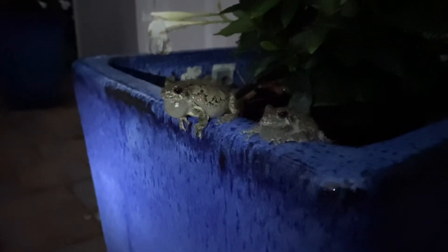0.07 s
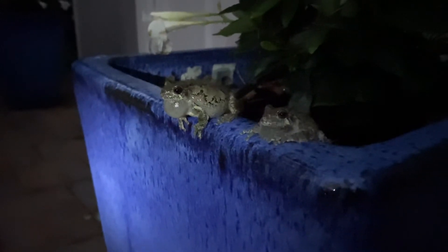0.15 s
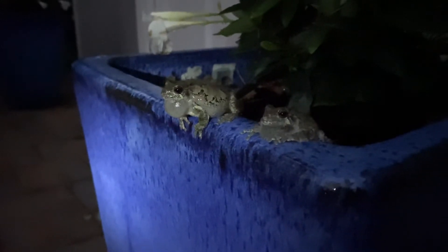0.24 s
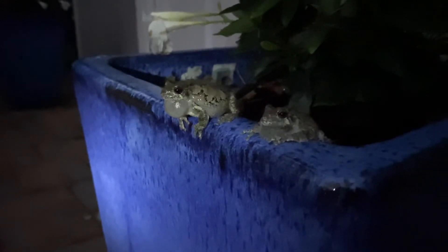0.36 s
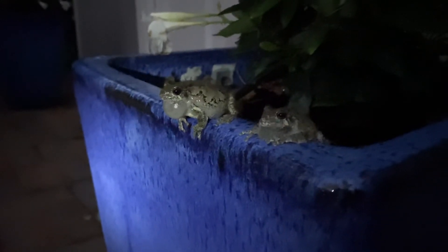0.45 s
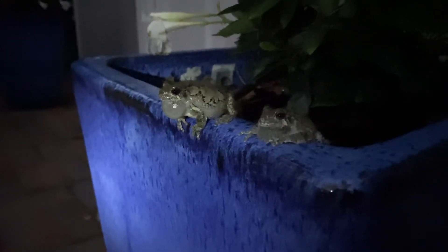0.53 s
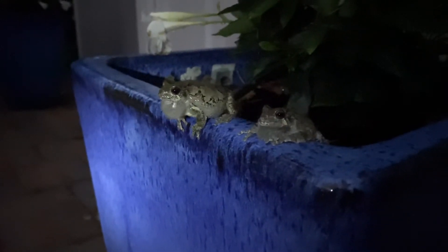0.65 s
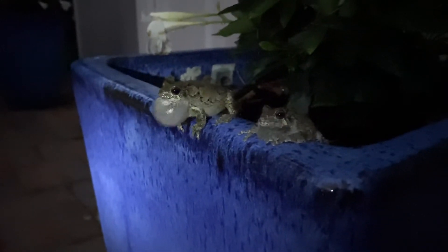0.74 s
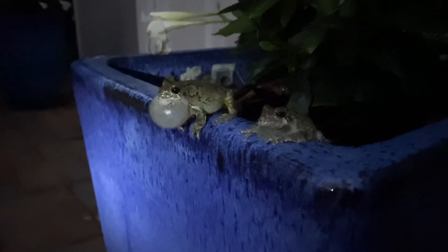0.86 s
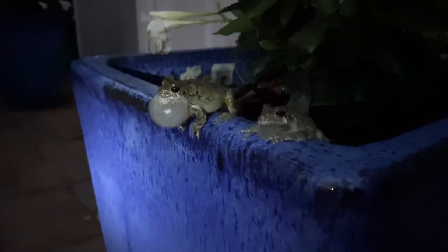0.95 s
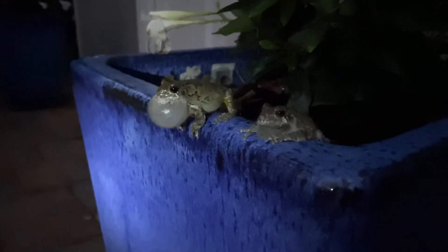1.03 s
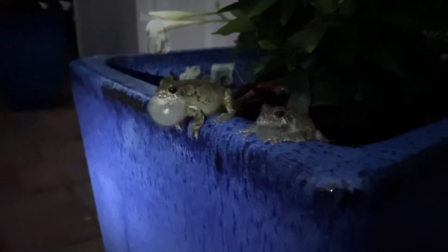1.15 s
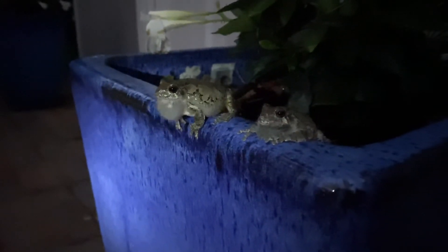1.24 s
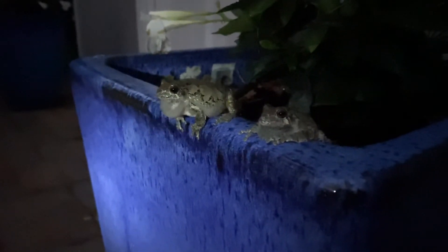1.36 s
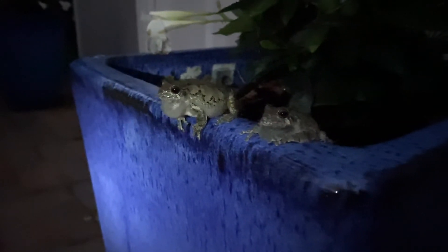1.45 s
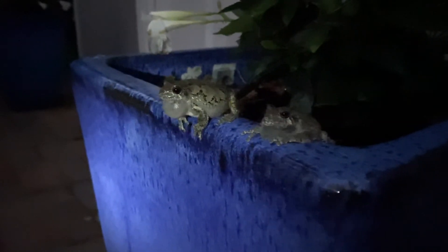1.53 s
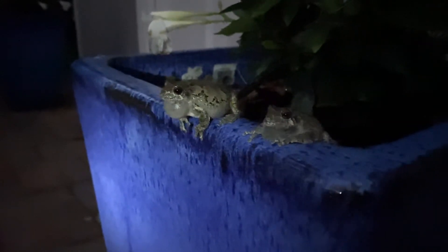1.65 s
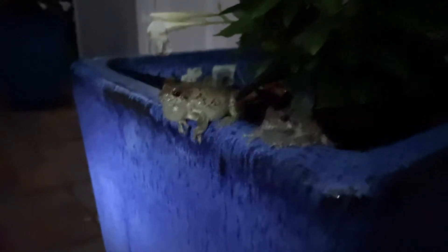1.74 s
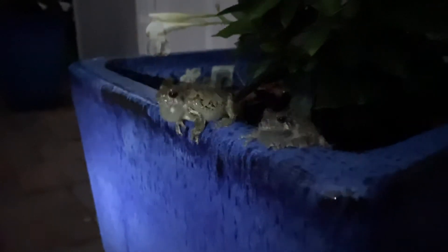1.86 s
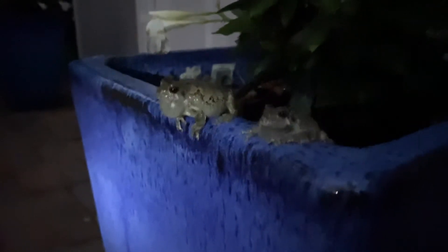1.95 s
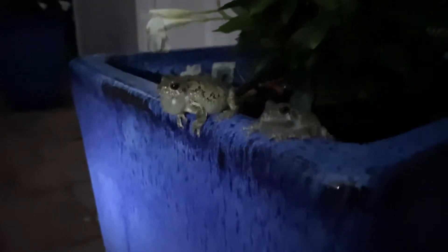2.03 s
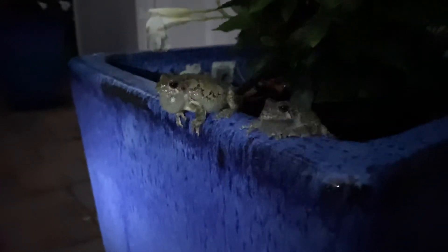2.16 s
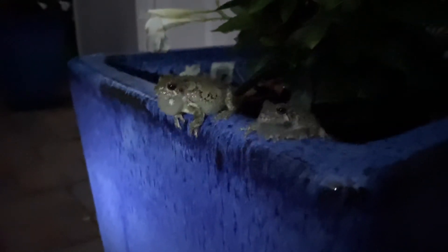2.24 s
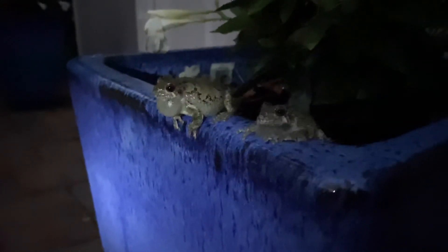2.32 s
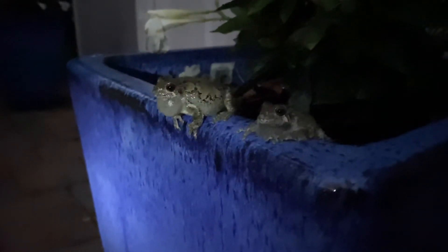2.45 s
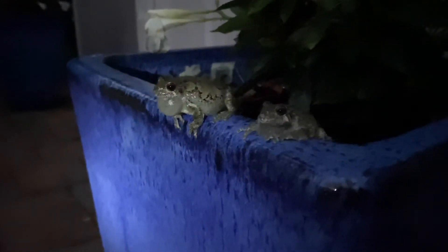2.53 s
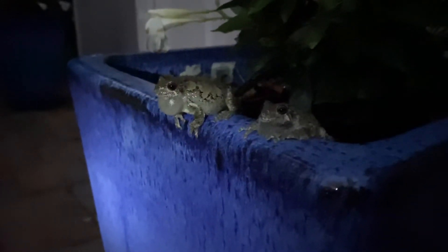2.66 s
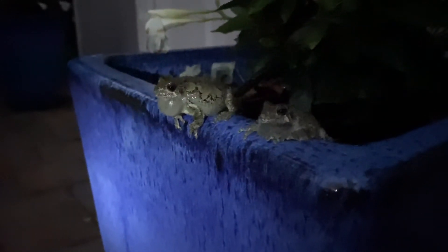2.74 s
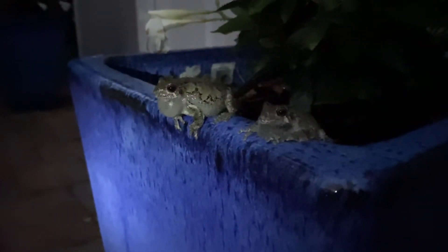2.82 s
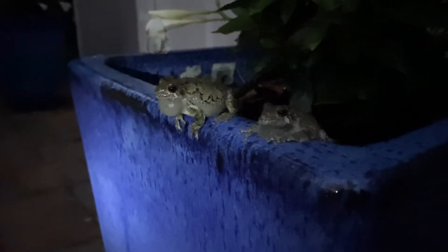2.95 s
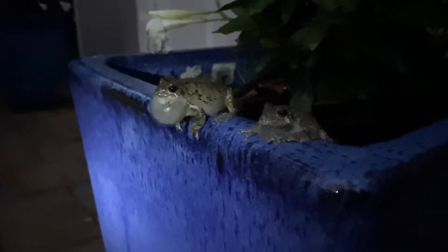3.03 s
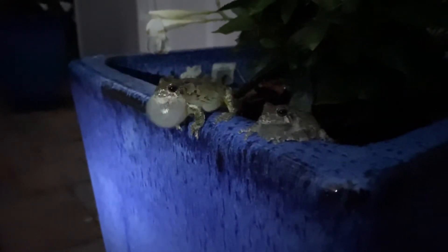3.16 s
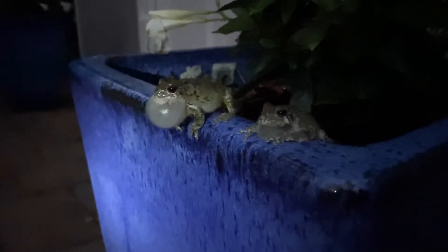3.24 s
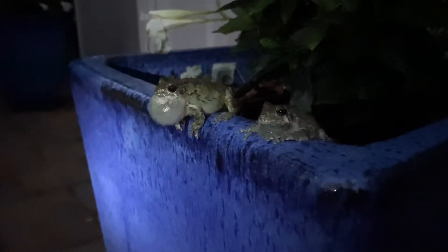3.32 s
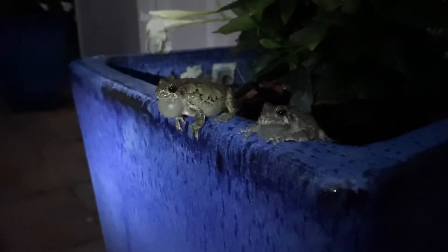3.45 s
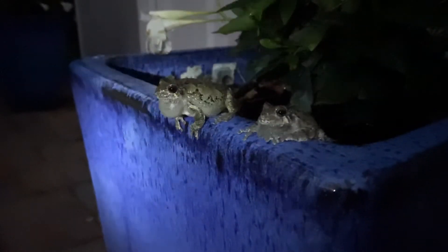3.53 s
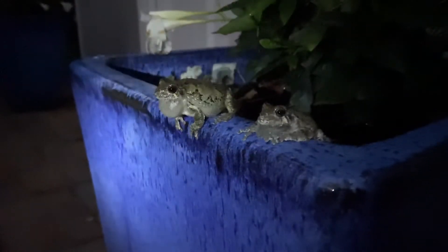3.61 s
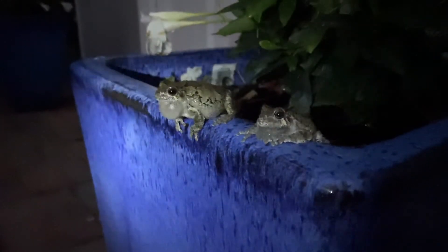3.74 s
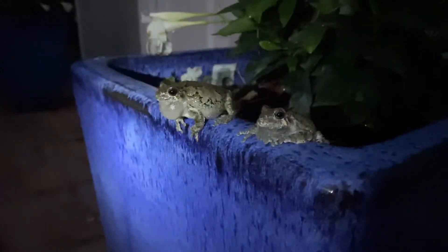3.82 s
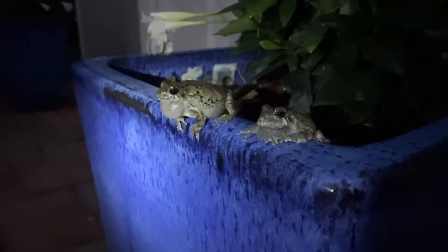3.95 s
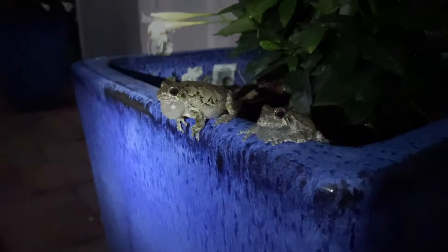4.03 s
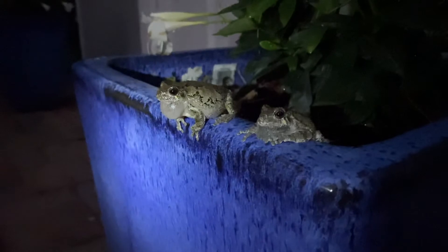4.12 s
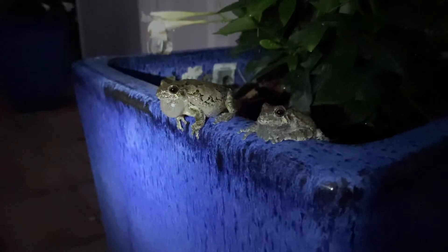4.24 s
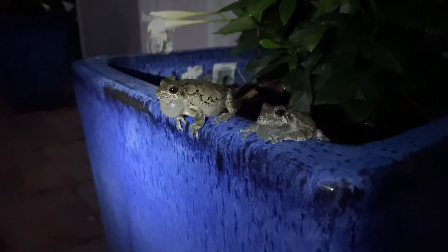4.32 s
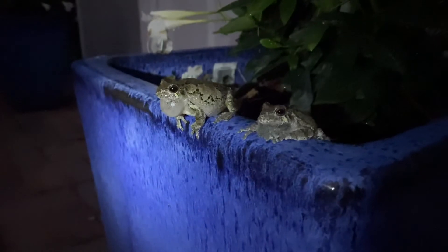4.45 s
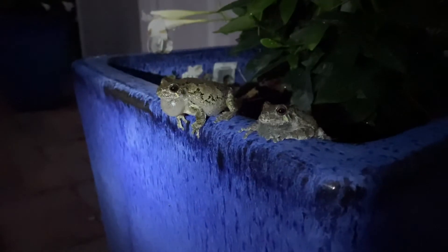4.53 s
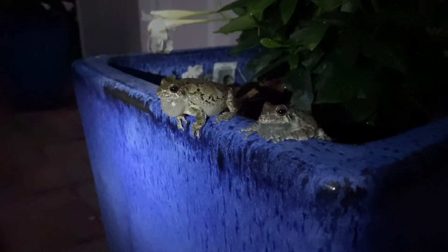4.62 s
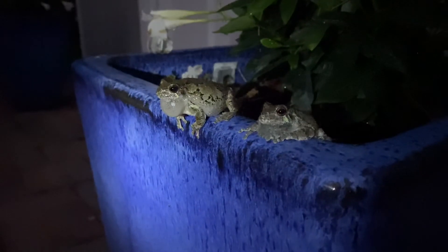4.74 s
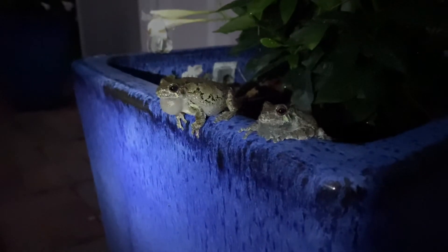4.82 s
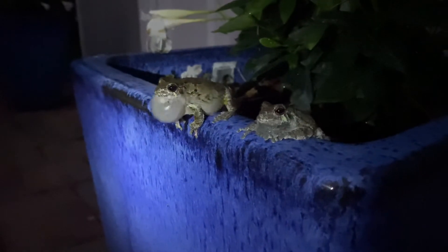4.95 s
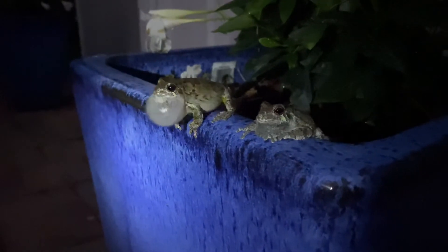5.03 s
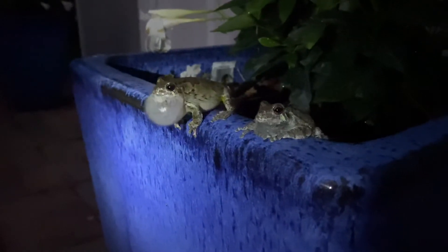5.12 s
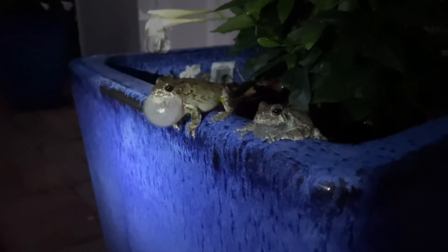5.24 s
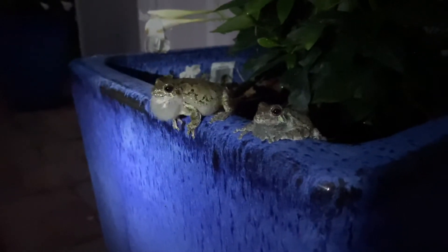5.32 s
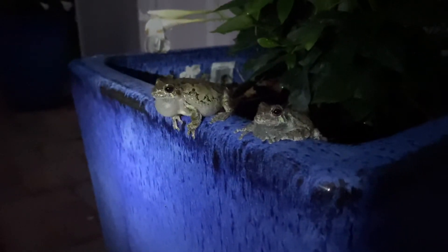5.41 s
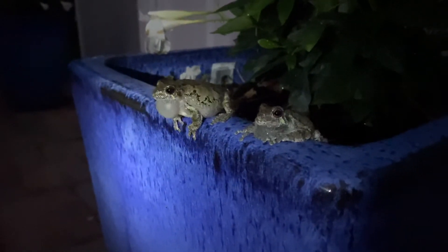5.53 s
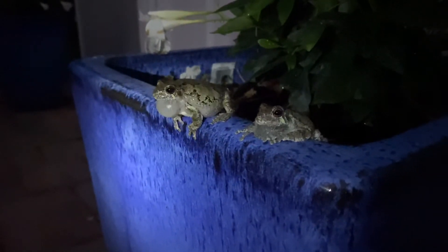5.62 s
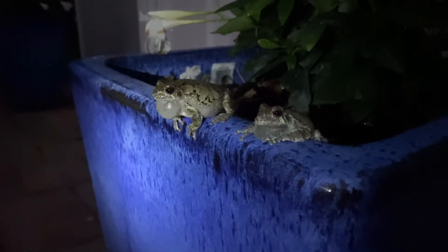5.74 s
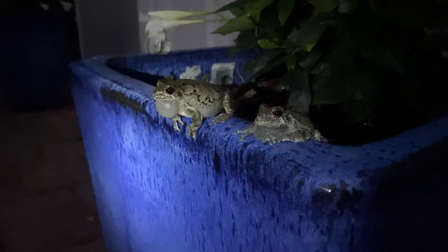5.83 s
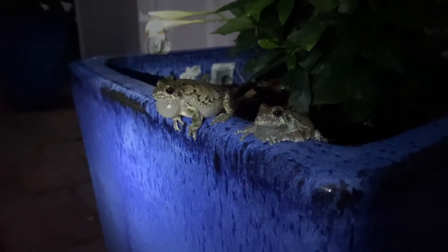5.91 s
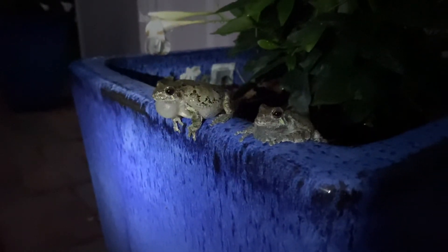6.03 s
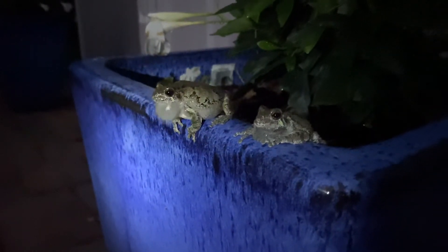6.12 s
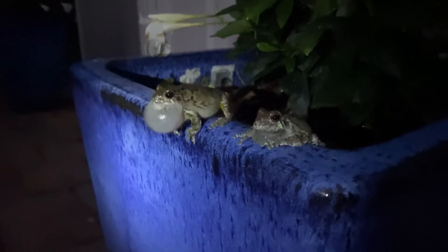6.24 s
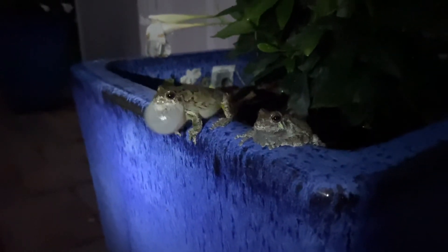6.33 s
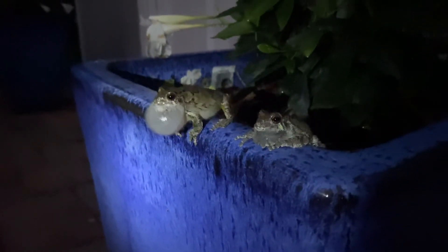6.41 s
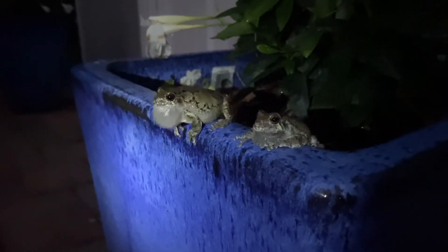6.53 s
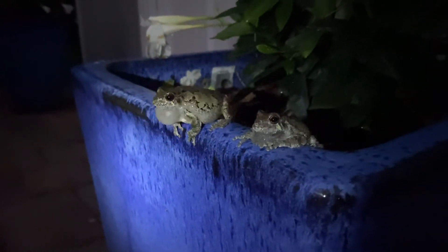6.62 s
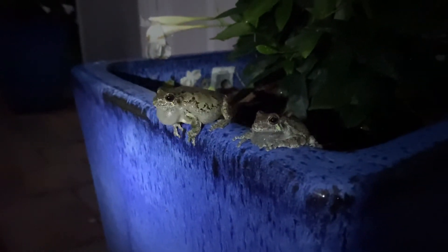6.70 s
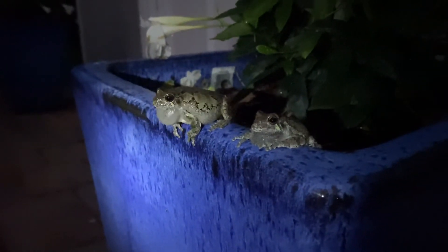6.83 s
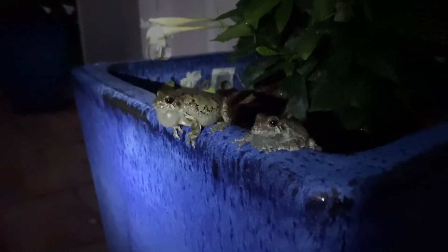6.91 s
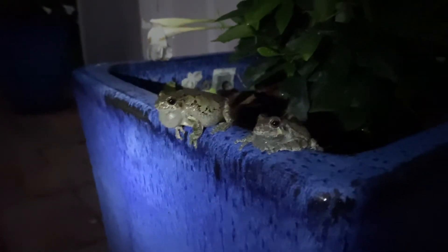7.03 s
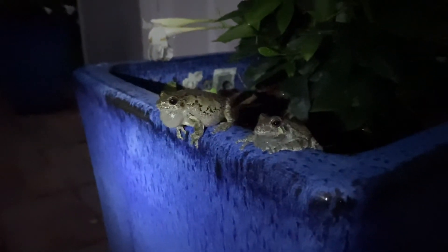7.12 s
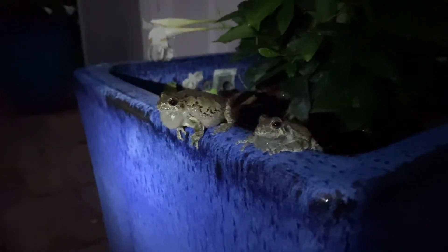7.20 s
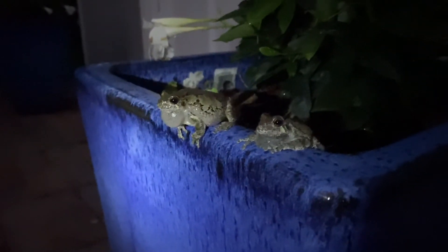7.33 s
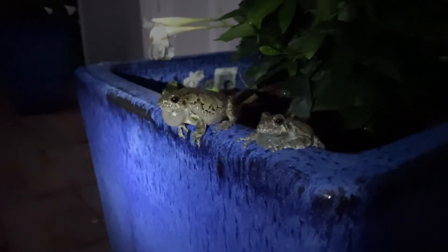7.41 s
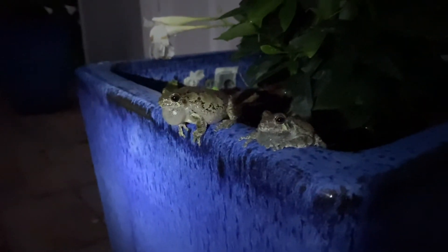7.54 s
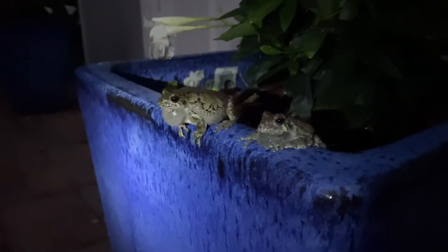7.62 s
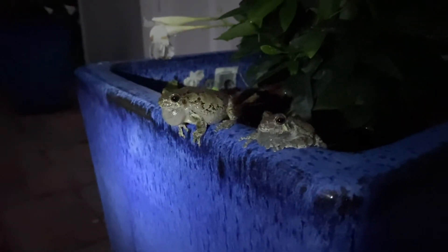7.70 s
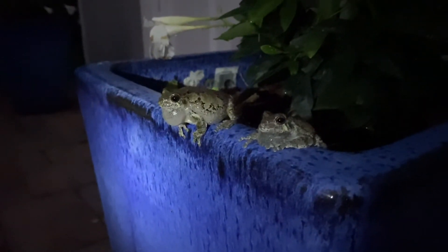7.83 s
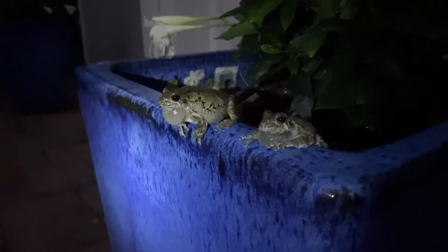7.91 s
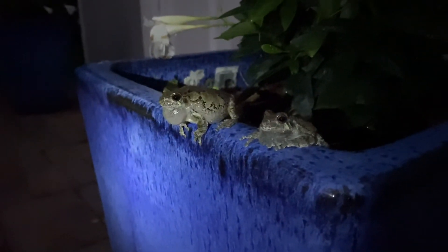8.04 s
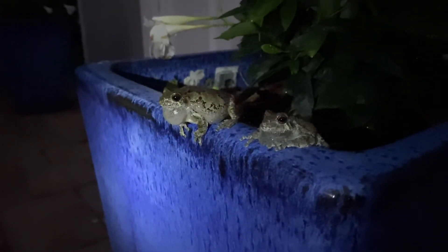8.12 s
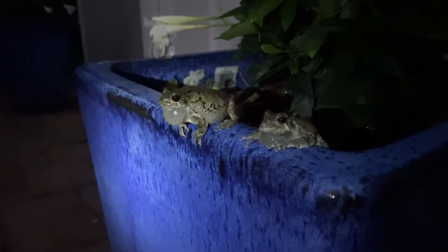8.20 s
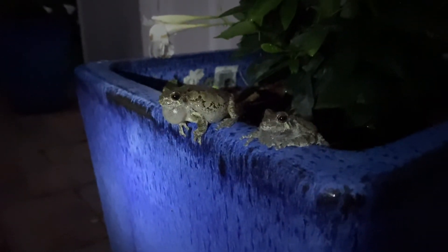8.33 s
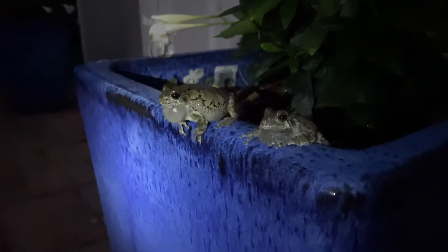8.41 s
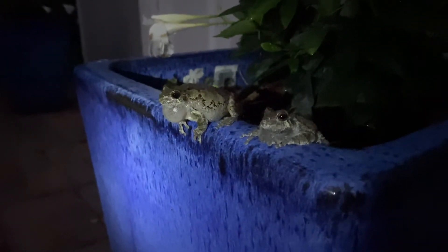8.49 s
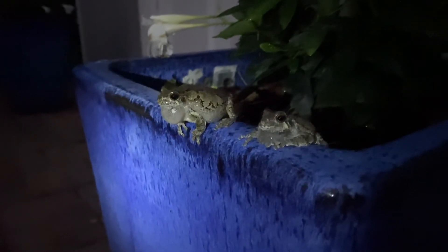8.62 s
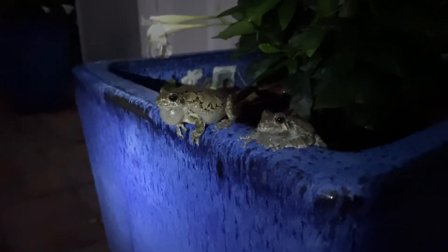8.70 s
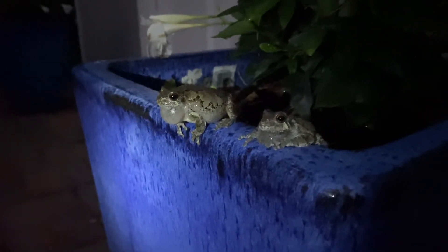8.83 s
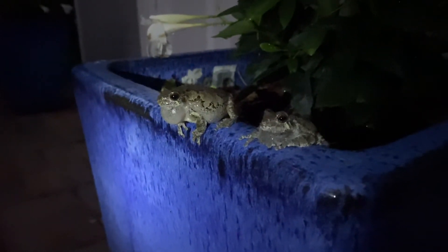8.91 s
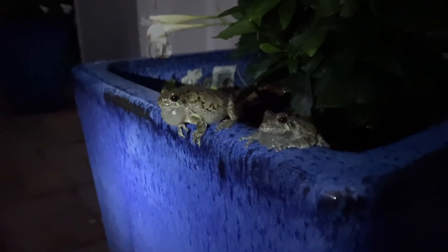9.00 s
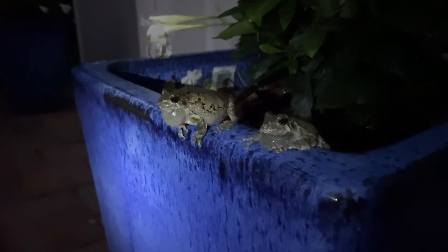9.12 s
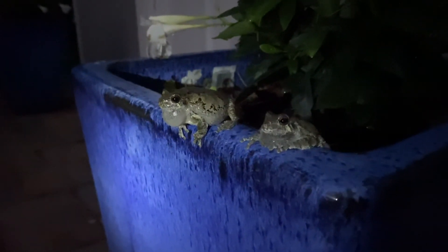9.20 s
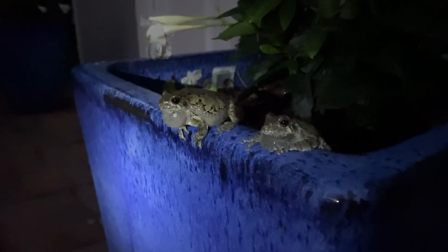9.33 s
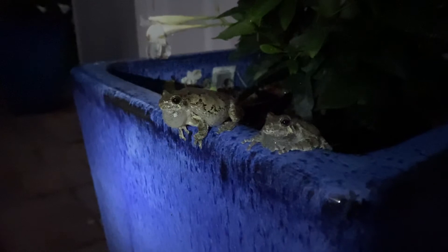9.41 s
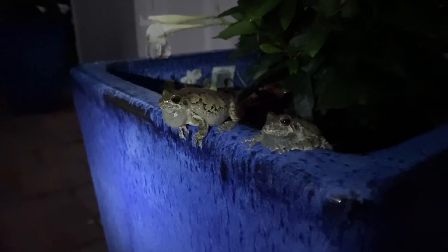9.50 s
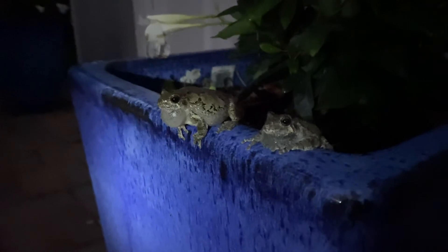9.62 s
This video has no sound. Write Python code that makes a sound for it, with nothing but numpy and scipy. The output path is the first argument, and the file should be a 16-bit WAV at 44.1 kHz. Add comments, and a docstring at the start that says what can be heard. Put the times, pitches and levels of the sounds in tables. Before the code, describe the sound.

On a quiet night outdoors, a tree frog on the rim of a glazed planter gives four loud trills, close to the microphone and slightly left. Each is a fast row of short rising chirps, starting weak and swelling at once, with a brief echo from walls and yard. A far frog trills very faintly three times. Beneath lie soft insects, low machine hum and distant traffic rumble.

```python
"""A gray tree frog trills four times at night on the rim of a glazed planter, close and a little to the left.
Each trill is a row of short upward chirps: harmonic partials plus noise, swept through vocal sac resonances.
House walls, porch and yard answer with reflections and diffuse noise tails.
A second frog trills far away, over faint noise-band insects, a low hum of machines and distant traffic."""
import sys
import numpy as np
from scipy import signal
from scipy.fft import rfft, irfft, next_fast_len
from scipy.io import wavfile
from scipy.ndimage import map_coordinates

SR = 44100
rng = np.random.default_rng(int(sys.argv[2]) if len(sys.argv) > 2 else 0)


def wav_out(sig):
    """Save sig, one row per channel (or a flat mono array), as 16-bit PCM at SR to the path in sys.argv[1]."""
    wavfile.write(sys.argv[1], SR, np.round(np.clip(np.atleast_2d(sig).T, -1, 1) * 32767).astype(np.int16))


N = 426006


def amp(db):
    """Decibels to amplitude ratio."""
    return 10 ** (np.asarray(db) / 20)


def unit(x):
    """x at rms 1."""
    return x / np.sqrt(np.mean(x ** 2) + 1e-20)


def along(points, hz):
    """Interpolate (Hz, value) points on a log frequency axis."""
    f, v = np.transpose(points)
    return np.interp(np.log(hz + 1), np.log(f + 1), v)


def wobble(rate_hz, size=N):
    """Smooth random curve, rate_hz knots a second."""
    knots = np.arange(size) * rate_hz / SR
    coarse = np.arange(0, knots[-1] + 1, 1 / 8)
    values = rng.standard_normal(int(knots[-1]) + 4)
    return np.interp(knots, coarse, map_coordinates(values, [coarse]))


def filtered(x, response):
    """x times a complex response of frequency."""
    n = x.shape[-1]
    m = next_fast_len(n + 2048, real=True)
    hz = np.fft.rfftfreq(m, 1 / SR)
    return irfft(rfft(x, m) * response(hz), m)[..., :n]


def coloured(x, spectrum):
    """x through a (Hz, dB) response of zero phase."""
    return filtered(x, lambda hz: amp(along(spectrum, hz)))


def ringing(points, size=4096):
    """Causal, minimum-phase impulse response of a (Hz, dB) colour, by folding its cepstrum."""
    hz = np.fft.rfftfreq(size, 1 / SR)
    cepstrum = irfft(np.log(amp(along(points, hz))))
    cepstrum[1:size // 2] *= 2
    cepstrum[size // 2 + 1:] = 0
    return irfft(np.exp(rfft(cepstrum)))[:size // 2]


def add(track, start_s, sound):
    """Mix a sound into a track from start_s on."""
    part = track[..., max(round(start_s * SR), 0):][..., :sound.shape[-1]]
    part += sound[..., :part.shape[-1]]


JITTER = .009  # pitch flutter, share of pitch, scaled by (2 - drive)
RASP_FOLLOW = .7  # rasp and high partials grow with this power of the drive
CATCH_S, CATCH_WIDTH_S, CATCH_DB = -.0108, .0028, -33  # rough catch as the folds part; s from the crest
# Course of one chirp. Each row: time from the crest in seconds, drive in dB, pitch ratio.
CHIRP_COURSE = [(-.017, -42, .82), (-.0135, -16, .855), (-.010, -14.3, .92), (-.005, -5.3, .985),
                (0, -3.1, 1.033), (.0025, -2.2, 1.083), (.0045, -5.8, 1.14), (.007, -24, 1.14),
                (0.012, -35, 1.177), (.016, -60, 1.197)]
# Partials of the vocal folds. Each row: multiple of the fundamental, level in dB.
FOLD_PARTIALS = [(1, -4.9), (2, -.2), (3, -27), (4, -40), (5, -43), (6, -49), (7, -46), (8, -47)]
# Rasp of the air between the folds. Each row: frequency in Hz, relative density in dB per Hz.
RASP_SPECTRUM = [(350, -4), (600, 5), (900, 4), (2500, 4), (3500, -1), (4500, -4), (6200, -8), (7500, -2),
                 (8300, -5), (9100, -18), (10000, -19), (11600, 3), (12800, -9), (13700, 3.5), (15000, -6)]
# Colour of the catch. Each row: frequency in Hz, relative density in dB per Hz.
CATCH_SPECTRUM = [(300, -2), (620, 6), (1000, -1), (1600, 0), (2700, -5), (4200, -10), (8000, -16),
                  (9200, -29), (12000, -18), (15000, -26)]


def chirp(pitch_hz, soft_db=0, rasp_db=-33.3, vary_db=.4, shorten_per_db=.022):
    """One push of air: folds swell, glide up as they tighten, and shut; soft is brief, mostly fundamental."""
    s, drive_db, ratio = np.transpose(CHIRP_COURSE)
    t = s[0] + np.arange(SR // 25) / SR
    s = s * np.exp(-shorten_per_db * soft_db)
    drive = amp(np.interp(t, s, drive_db, left=-120, right=-120))
    # the folds flutter most while the push is weak
    flutter = 1 + JITTER * (2 - drive) * wobble(900, size=len(t))
    pitch = pitch_hz * np.interp(t, s, ratio) * flutter
    phase = 2 * np.pi * np.cumsum(pitch) / SR

    k, partial_db = np.transpose(FOLD_PARTIALS)
    softness_db = np.where(k == 1, soft_db, -soft_db) / 2
    # partials above the second vary from push to push
    variation_db = vary_db * k * (k > 2) * rng.standard_normal(len(k))
    swell = drive ** np.where(k > 2, RASP_FOLLOW, 1)[:, None]
    partials = swell * np.sin(np.outer(k, phase))
    tone = amp(partial_db + softness_db + variation_db) @ partials

    # air hisses through the gap once in each cycle
    puffs = rng.standard_normal(len(t)) * (1 + np.cos(phase))
    rasp = amp(rasp_db) * drive ** RASP_FOLLOW * unit(coloured(puffs, RASP_SPECTRUM))

    grit = unit(coloured(rng.standard_normal(len(t)), CATCH_SPECTRUM))
    catch = amp(CATCH_DB) * np.exp(-((t - CATCH_S) / CATCH_WIDTH_S) ** 2) * grit
    return tone + catch + rasp


SLOWING_S = .00048  # each period is this much longer than the one before
LEAD_S = .005  # extra pause after the faint opening puff
BUILD = 4.2  # the level shortfall in dB shrinks by this factor with every chirp
EASE_DB, EASE_S = 2.3, .012  # late easing: depth, tanh time scale
FLAT, TIGHTEN_S = .035, .1  # slack folds at the start: share of pitch, time constant
SAG_PER_DB, SAG_MOST = .0028, .1  # weak push is lower: share of pitch per dB of shortfall, limit


def trill(count, period_s, level_db, puff_db, shortfall_db, ease_s, pitch_hz):
    """Rows (s, dB, Hz): a faint puff, a quick build-up, then chirps that slow, rise in pitch and ease off."""
    k = np.arange(-1, round(count))
    s = k * period_s + SLOWING_S * k * (k - 1) / 2 - LEAD_S * (k < 0)
    weak_db = np.where(k < 0, puff_db, shortfall_db / BUILD ** k)
    eased = (1 + np.tanh((s - ease_s) / EASE_S)) / 2
    sag = np.minimum(SAG_PER_DB * weak_db, SAG_MOST)
    slack = FLAT * np.exp(-s / TIGHTEN_S) + sag
    return np.transpose([s, level_db - weak_db - EASE_DB * eased, pitch_hz * (1 - slack)])


# Trills of the near frog. Each row: crest of the first full chirp in seconds, number of full chirps,
# first period in seconds, level in dB, shortfall of the opening puff in dB, shortfall of the first chirp
# in dB, time into the trill when the push eases in seconds, pitch in Hz before slack and glide.
NEAR_TRILLS = [(.6886, 11, .0373, -4.2, 31, 5, .25, 1022), (2.9592, 8, .03755, -3.5, 52, 13, .21, 1016),
               (4.8817, 9, .03735, -4.1, 52, 11, .21, 1014), (6.1178, 8, .0378, -3.6, 40, 8, .135, 1020)]


def near_frog(full_db=-6, softest_db=11, scatter_db=.5):
    """Push-by-push trills of the frog on the rim; the opening chirps are weak, low and dull."""
    voice = np.zeros(N)
    for start_s, *shape in NEAR_TRILLS:
        for s, db, pitch_hz in trill(*shape):
            push = chirp(pitch_hz, soft_db=np.clip(full_db - db, 0, softest_db))
            level = amp(db + scatter_db * rng.standard_normal())
            add(voice, start_s + s + CHIRP_COURSE[0][0], level * push)
    return voice


# Sac and planter rim as heard at each microphone. Each row: frequency in Hz, level in dB.
SAC_RIM_LEFT = [(300, -40), (500, -24.5), (750, -12.5), (880, -0.5), (980, -5), (1070, -8.5), (1220, 6.5),
                (1500, -10.5), (1850, -5), (2020, 4.5), (2170, -2.5), (2310, 0.24), (2750, -4),
                (3700, -5.5), (9000, -8)]
SAC_RIM_RIGHT = [(300, -43.5), (500, -32.5), (750, -24), (880, -14), (980, -23), (1070, -36), (1220, 2),
                 (1500, -6.5), (1850, -21), (2020, -5), (2170, -22), (2310, -1.5), (2750, -9.5),
                 (3700, -18.5), (6000, -7.5), (9000, -7.5)]
# Narrow mouth and sac resonances. Each row: frequency in Hz, width in Hz, dB over the smooth response.
MOUTH_RESONANCES = [(2740, 120, -5), (3135, 130, -1), (3930, 110, 2), (4310, 110, 2), (5120, 120, 2),
                    (6030, 70, 0), (6830, 150, -2), (7190, 110, 1), (7560, 150, 0), (7900, 150, -2),
                    (11250, 150, 0)]
# Phase between the microphones. Each row: frequency in Hz, lead of the left in radians.
LEFT_LEAD = [(600, .1), (1000, 0.28), (1250, 1.1), (2000, .3), (2300, 0.61), (3200, .4), (5000, .4),
             (8000, 1.6), (11500, 2.4), (13500, 2.8)]


def at_microphones(voice):
    """Every chirp sweeps through the resonances of the sac and reaches the left microphone first."""
    def mouth(hz):
        response = 1
        for centre, width, db in MOUTH_RESONANCES:
            damping = 1j * hz * width
            response = response + amp(db) * damping / (centre ** 2 - hz ** 2 + damping)
        return response

    sac = np.array([ringing(SAC_RIM_LEFT), ringing(SAC_RIM_RIGHT)])
    pair = signal.fftconvolve(voice[None], filtered(sac, mouth), axes=1)[:, :N]
    return filtered(pair, lambda hz: np.exp(.5j * along(LEFT_LEAD, hz) * [[1], [-1]]))


# Nearby walls. Each row: delay in seconds, left level in dB, right level in dB.
WALL_ECHOES = [(.0035, -29.5, -13), (0.0126, -40.5, -30)]


def walls(x):
    """Single reflections from the house: delayed, panned copies."""
    echo = np.zeros((2, N))
    for delay_s, left_db, right_db in WALL_ECHOES:
        add(echo, delay_s, amp([[left_db], [right_db]]) * x)
    return echo


def reverb(x, decay, onset_s=.008):
    """Diffuse stereo noise tail; each frequency dies at its own speed."""
    hz, t, z = signal.stft(rng.standard_normal((2, SR)), SR, nperseg=256)
    decayed = z * amp(-60 * t / along(decay, hz)[:, None])
    tail = signal.istft(decayed, SR, nperseg=256)[1]
    tail *= 1 - np.exp(-np.arange(tail.shape[1]) / SR / onset_s)
    return signal.fftconvolve(x[None], tail / np.linalg.norm(tail[0]), axes=1)[:, :N]


# What the porch throws back. Each row: frequency in Hz, level in dB.
PORCH_COLOUR = [(500, -31), (900, -34), (1250, -27), (2050, -32), (3000, -24), (4500, -28), (12000, -29)]
# Decay of the porch. Each row: frequency in Hz, t60 in seconds.
PORCH_T60 = [(1000, .11), (2200, .11), (8000, .12)]


def porch(voice):
    """Coloured voice scattered into a short diffuse tail."""
    return reverb(coloured(voice, PORCH_COLOUR), PORCH_T60)


# Trills of the far frog. Each row: start in seconds, end in seconds, level in dB before the yard's
# gains and colour, pitch in Hz before slack and glide.
FAR_TRILLS = [(1.12, 1.43, -60.5, 1000), (6.55, 6.82, -57.2, 980), (8.362, 8.70, -57.2, 988)]


def far_frog(period_s=.0355, swell_s=.04, flat=.06, tighten_s=.13):
    """Trills that start soft and low, swell quickly and rise slowly in pitch."""
    voice = np.zeros(N)
    for start_s, end_s, db, pitch_hz in FAR_TRILLS:
        for s in np.arange(0, end_s - start_s, period_s):
            effort = 1 - np.exp(-(s + period_s / 2) / swell_s)
            push = chirp(pitch_hz * (1 - flat * np.exp(-s / tighten_s)))
            add(voice, start_s + s + CHIRP_COURSE[0][0], amp(db) * effort * push)
    return voice


# What the sac sends out across the yard. Each row: frequency in Hz, level in dB.
SAC_CARRY = [(500, -30.5), (1100, -13), (1500, -16), (1850, -2.5), (2050, 0), (2300, -6), (2600, -13),
             (3200, -1), (6000, -13)]


def carried(voice):
    """Mostly the strong second partial carries into the distance."""
    return coloured(voice, SAC_CARRY)


# Decay of the yard. Each row: frequency in Hz, t60 in seconds.
YARD_T60 = [(300, .5), (1100, .7), (2050, 1.05), (3200, 0.57), (10000, .25)]


def yard(voice, far):
    """Both frogs echo in the yard; the far one is heard as much through the echoes as directly."""
    echoes = reverb(amp(-39.5) * voice + amp(1.2) * far, YARD_T60)
    return carried(amp(1.5) * far + echoes)


# Stereo likeness of the background. Each row: frequency in Hz, left-right correlation.
LEFT_RIGHT_LIKENESS = [(60, 0.99), (130, 0.87), (290, 0.45), (640, -0.06), (1410, -0.33), (3100, 0.094),
                       (6820, 0.0053), (15000, 0.1)]


def rush(spectrum):
    """Stereo noise of rms 1, nearly mono in the bass: the mid/side balance sets the correlation."""
    def mid_side(hz):
        turn = np.arccos(np.clip(along(LEFT_RIGHT_LIKENESS, hz), -1, 1)) / 2
        return amp(along(spectrum, hz)) * [np.cos(turn), np.sin(turn)]

    mid, side = filtered(rng.standard_normal((2, N)), mid_side)
    return unit(np.array([mid + side, mid - side]))


# Distant insects. Each row: frequency in Hz, relative density in dB per Hz.
INSECT_SPECTRUM = [(1700, -30), (2300, 0), (3300, -12), (4500, -1), (5600, -25), (6500, -14), (6780, -2),
                   (7200, -25), (9000, -50)]


def insects(db=-85, waver_db=1.5, flutter_db=2):
    """Faint far chorus: noise bands that swell and flutter."""
    level_db = db + waver_db * wobble(3) + flutter_db * wobble(30)
    return amp(level_db) * rush(INSECT_SPECTRUM)


# Machine hum. Each row: frequency in Hz, middle level in dB rms.
HUM_TONES = [(68, -67.5), (120, -71.5), (205, -79), (240, -76.5)]


def machine_hum(waver_db=1.9, waver_rad=.67):
    """Steady low tones, each wavering in level and phase."""
    t = np.arange(N) / SR
    hum = np.zeros(N)
    for hz, db in HUM_TONES:
        level = amp(db + waver_db * wobble(2.3)) * np.sqrt(2)
        hum += level * np.sin(2 * np.pi * hz * t + waver_rad * wobble(3.9))
    return hum


RUMBLE_DB = -60.3
SWELL_AT_S, SWELL_S, SWELL_DB = 8.7, 1.1, 3.3  # one swell: centre, Gaussian width, height
# Traffic rumble. Each row: frequency in Hz, relative density in dB per Hz.
RUMBLE_SPECTRUM = [(20, -36), (35, -23), (50, -6.5), (66, 1), (85, -7), (115, -7.5), (160, -11), (230, -18),
                   (290, -18), (360, -28), (600, -54.5)]


def distant_traffic(waver_db=1.0):
    """Low noise that wavers and swells once."""
    t = np.arange(N) / SR
    swell_db = SWELL_DB * np.exp(-((t - SWELL_AT_S) / SWELL_S) ** 2)
    return amp(RUMBLE_DB + swell_db + waver_db * wobble(8)) * rush(RUMBLE_SPECTRUM)


# Faint air. Each row: frequency in Hz, relative density in dB per Hz.
AIR_SPECTRUM = [(160, -28), (280, -10), (379, -15), (427, -8), (662, -9), (912, -8), (1560, -15),
                (3570, -20.5), (4600, -21), (6780, -26), (8300, -31.5), (9030, -50.5), (10000, -32.5),
                (11200, -35.5), (15800, -50.5)]


def faint_air(db=-71.8):
    """Steady broadband noise, weaker toward the treble."""
    return amp(db) * rush(AIR_SPECTRUM)


def scene():
    """Both frogs and their echoes over the night's background."""
    voice, far = near_frog(), far_frog()
    near = at_microphones(voice)
    frogs = near + walls(near[0]) + porch(voice) + yard(voice, far)
    return frogs + insects() + machine_hum() + distant_traffic() + faint_air()


TOP_HZ = 15800


def record(dry):
    """Band limit: nothing is kept from TOP_HZ up."""
    return filtered(dry, lambda hz: hz < TOP_HZ)


dry = scene()
out = record(dry)
wav_out(out)
```